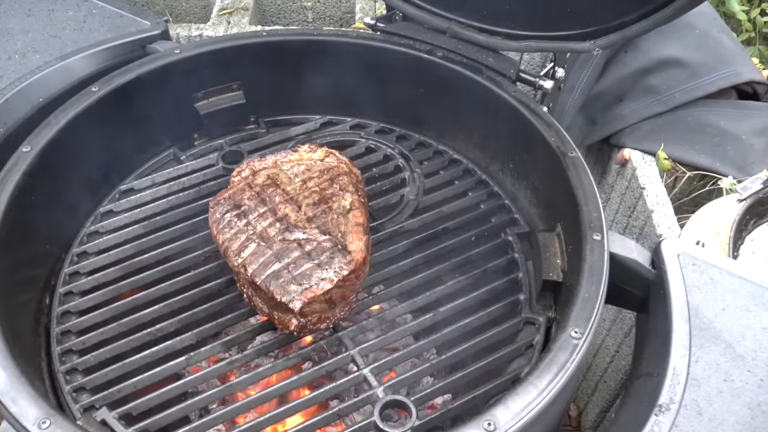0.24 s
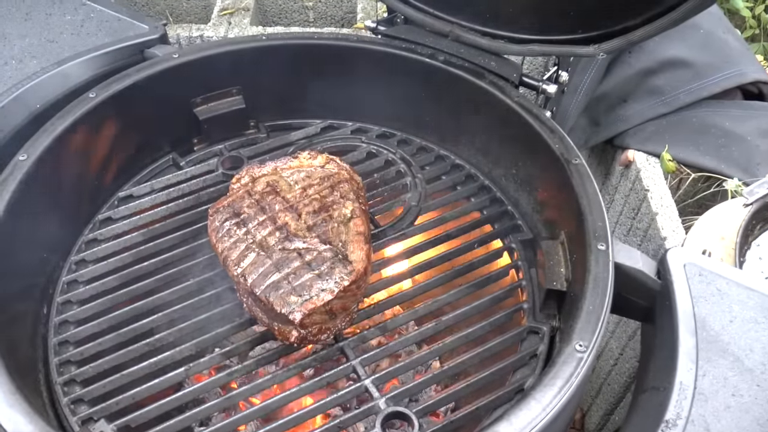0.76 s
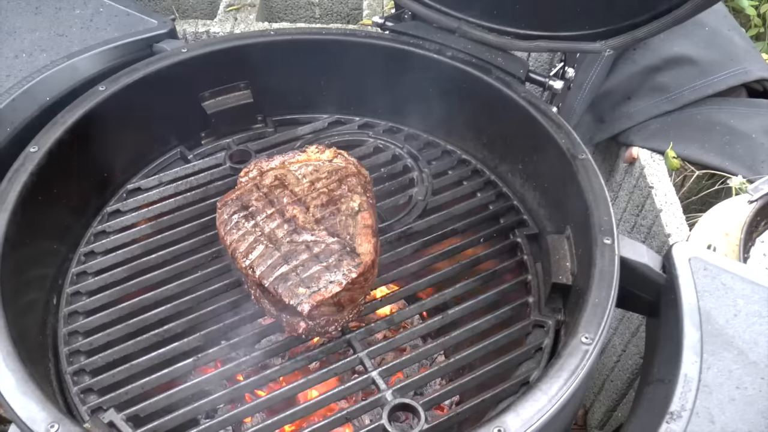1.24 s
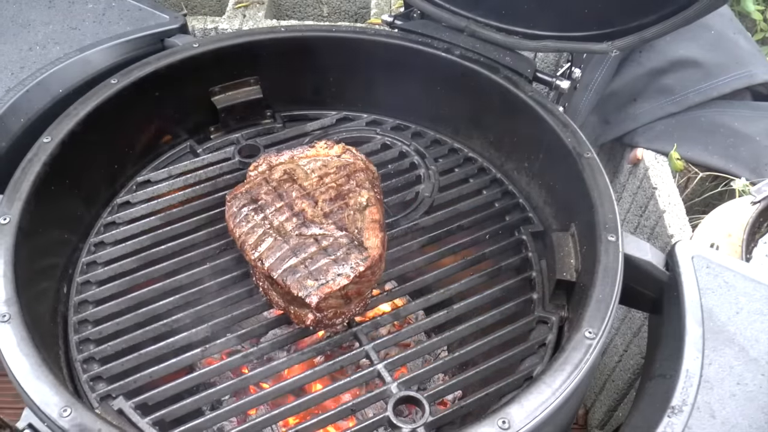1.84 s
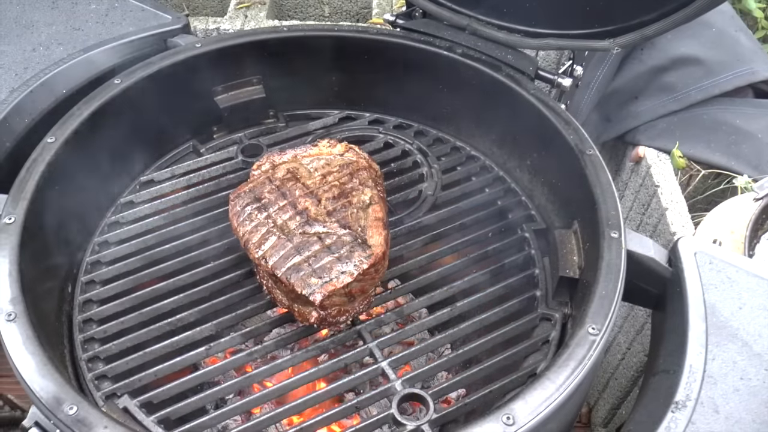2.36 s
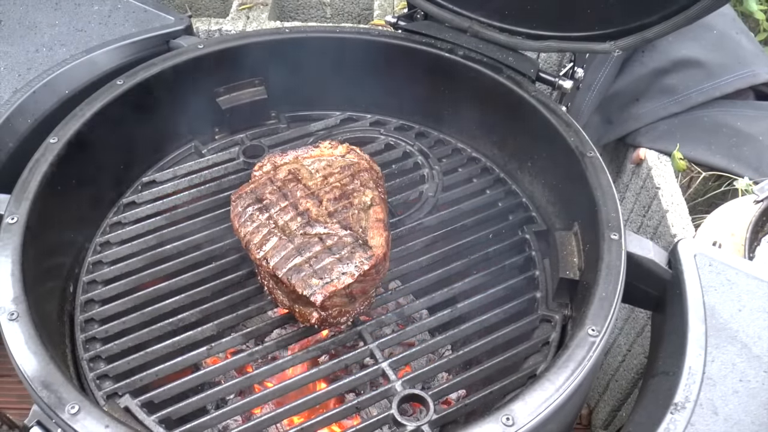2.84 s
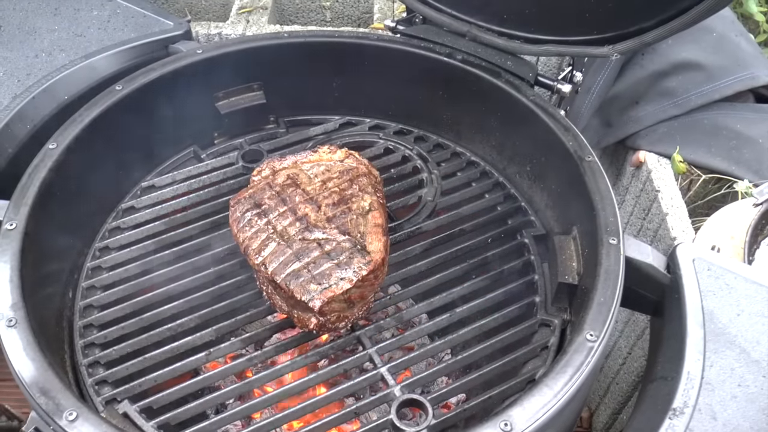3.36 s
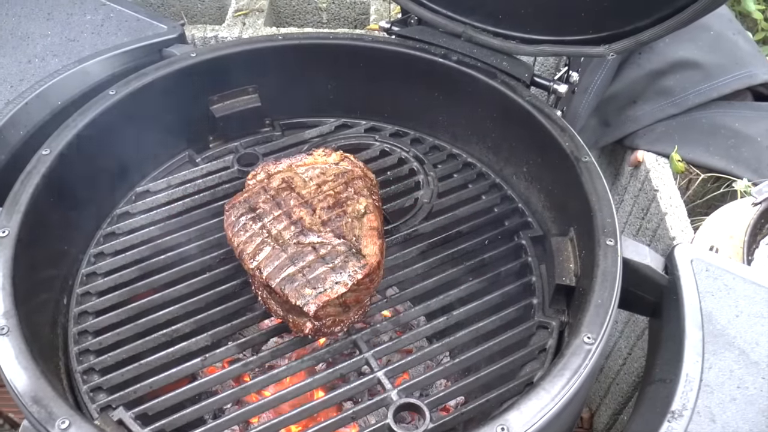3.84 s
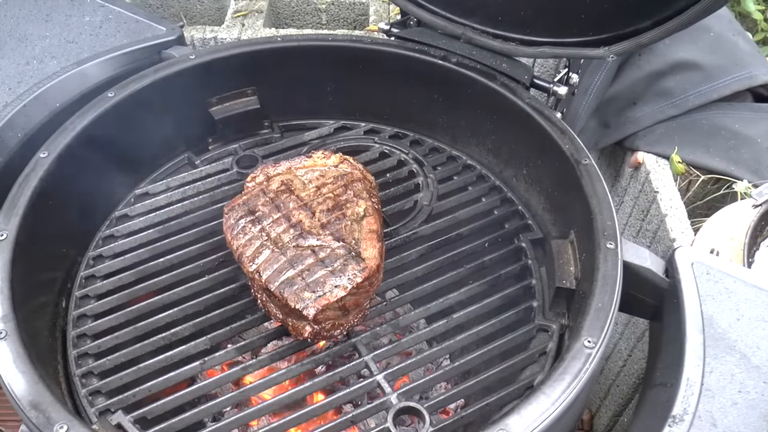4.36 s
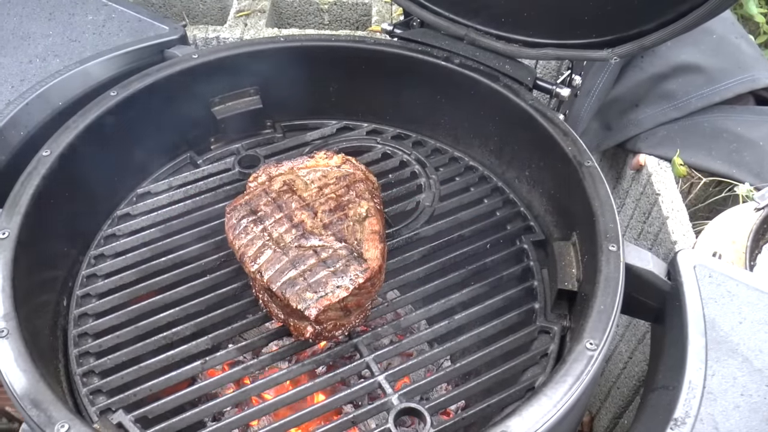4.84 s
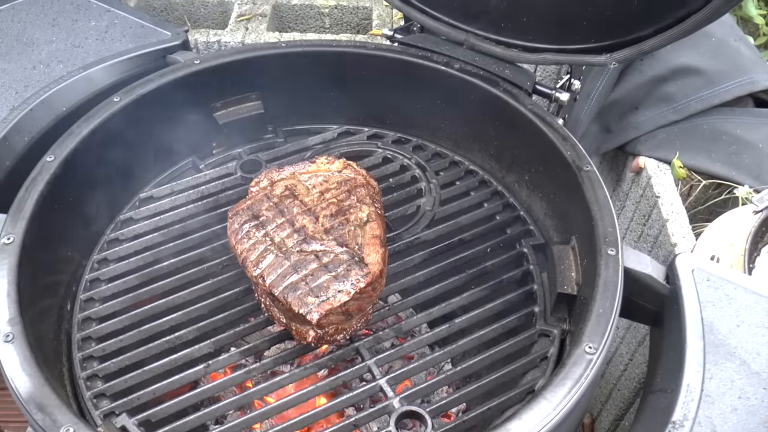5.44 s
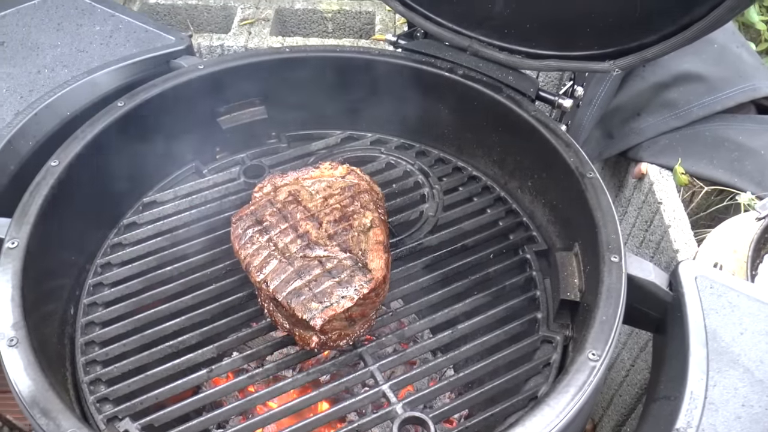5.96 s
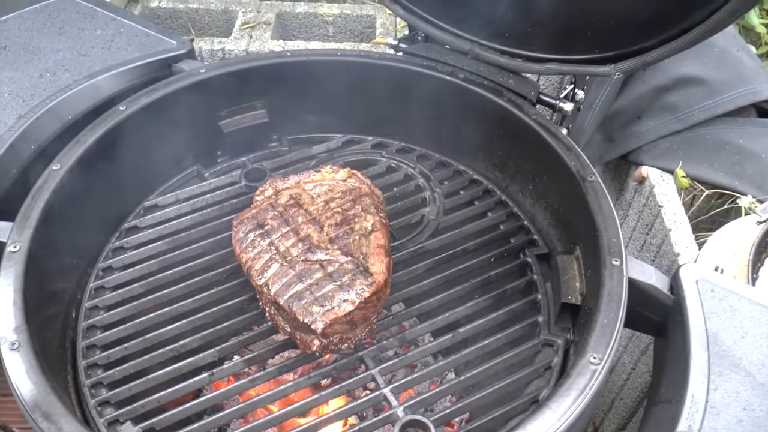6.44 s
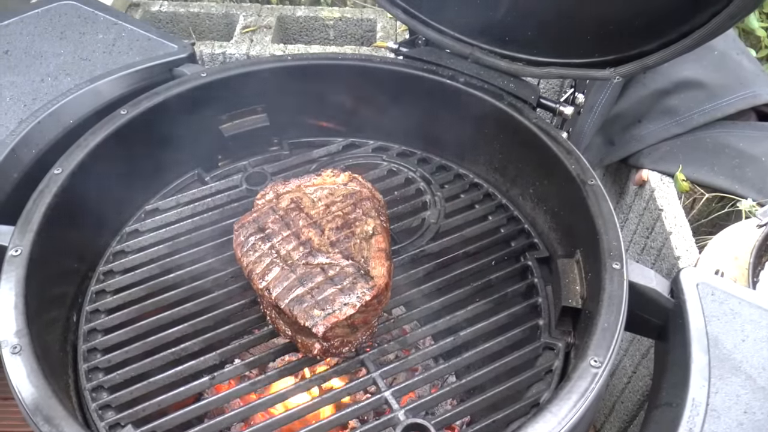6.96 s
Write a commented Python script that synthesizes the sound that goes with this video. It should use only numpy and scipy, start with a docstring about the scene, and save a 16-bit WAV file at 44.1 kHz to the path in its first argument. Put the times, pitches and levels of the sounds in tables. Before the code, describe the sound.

Outdoors, close above a round charcoal grill, in mono, a thick piece of meat sizzles without pause for about seven seconds. The sound is a bright, dense hiss of tiny bubbles, steam jets and dry crackle, fluctuating quickly, with boiling juice ringing faintly metallic in the bowl and thin hoarse steam notes fading in and out. Coals murmur softly below, stirring a little more around 0.9. Small fat spits pop in the first second; at about 0.74 a loud sharp crack comes with a cluster of soft low flare puffs. Two more puffs thump near 1.6. From 1.7 to 2.5 a wind gust rumbles low and flutters on the microphone. Afterwards come weak puffs of breeze, crisp ticks and spits near 3.8, 4.35, 4.9 and 6.9, and short fizzes near 5.4 and 6.0. The sizzle swells around 6.5 and is still going at the end.

```python
"""A thick piece of meat sizzles on the grate of a round charcoal grill outdoors, in mono from just above.
The crust is dense ringing bubbles, steam jets and crackle; juice boils through the bowl's resonances.
Beads fizz, steam sings in narrow bands, fat spits as noise bursts, droplets tick and drips flare as soft pushes.
Shaped noise and clicks make the fire's murmur; low noise is a breeze, a strong gust and several light ones.
"""
import sys
import numpy as np
from scipy import signal
from scipy.fft import rfft, irfft, next_fast_len
from scipy.io import wavfile
from scipy.ndimage import uniform_filter1d, map_coordinates

SR = 44100
rng = np.random.default_rng(int(sys.argv[2]) if len(sys.argv) > 2 else 0)


def unload_audio(sound):
    """Save the sound as a 16-bit wav file, at the path given as the first command line argument."""
    columns = np.transpose(np.atleast_2d(sound))
    # keep every value between -1 and 1, then stretch to whole-number steps
    steps = np.round(np.clip(columns, -1, 1) * 32767)
    wavfile.write(sys.argv[1], SR, steps.astype(np.int16))


N = 317079

# Resonances of the grill's bowl. Each row: frequency in Hz, bandwidth in Hz, relative level in dB.
BOWL_MODES = [(473, 79, -8), (697, 100, -10.5), (1441, 59, 6.5), (1920, 44, -1), (2065, 57, -0.5),
              (2581, 54, 7), (2994, 174, 7.5), (3316, 104, 1), (3575, 52, 5), (3977, 58, 2.5),
              (4450, 81, 0.5), (4970, 110, -16.5)]


def from_db(db):
    """Amplitude ratio: 20 dB is a factor of ten."""
    return 10 ** (np.asarray(db) / 20)


def rms_one(x):
    """Normalise to unit mean square, so that a gain sets the power."""
    return x / np.sqrt(np.mean(x ** 2) + 1e-20)


def in_time(rows):
    """Linear interpolation of a curve at every sample."""
    return np.interp(np.arange(N) / SR, *np.transpose(rows))


def drift(corner_hz):
    """Slow random modulation of unit power: noise through a double real pole."""
    step = 40   # samples from one computed value to the next
    pole = np.exp(-2 * np.pi * corner_hz * step / SR)
    noise = rng.standard_normal(N // step + 2002)
    slow = signal.lfilter([1], [1, -2 * pole, pole * pole], noise)[2000:]   # past the filter's onset
    return np.interp(np.arange(N) / step, np.arange(len(slow)), rms_one(slow))


def coloured(x, spectrum):
    """Zero-phase spectral shaping, with dB interpolated over log frequency."""
    hz, db = np.transpose(spectrum)
    size = next_fast_len(2 * len(x))
    bins = np.maximum(np.fft.rfftfreq(size, 1 / SR), 1)
    gain = from_db(np.interp(np.log(bins), np.log(hz), db))
    return irfft(rfft(x, size) * gain, size)[:len(x)]


def cut(x, hz, kind, order=2):
    """Causal low- or high-pass with a maximally flat passband."""
    sections = signal.butter(order, min(hz, .45 * SR), kind, fs=SR, output="sos")
    return signal.sosfilt(sections, x)


def resonance(x, hz, width_hz):
    """Damped oscillator: a pole pair whose bandwidth sets the decay; the peak gain is about 1."""
    r = np.exp(-np.pi * width_hz / SR)
    zeros = np.array([1, 0, -1]) * (1 - r * r) / 2
    poles = [1, -2 * r * np.cos(2 * np.pi * hz / SR), r * r]
    return signal.lfilter(zeros, poles, x + 1e-18)


def add(out, s, sound, peak_db):
    """Superposition: place a short sound at a time, scaled to a peak."""
    room = out[round(s * SR):][:len(sound)]
    scaled = from_db(peak_db) * sound / np.abs(sound).max()
    room += scaled[:len(room)]


def swell(start, end, fade_s):
    """Trapezoidal envelope with linear ramps inside its two ends."""
    t = np.arange(N) / SR
    return np.clip(np.minimum(t - start, end - t) / fade_s, 0, 1)


def hump(s, length):
    """Half-cosine envelope, centred on a time."""
    return np.cos(np.pi * np.clip((np.arange(N) / SR - s) / length, -.5, .5))


def wall_echo(x, share):
    """Single reflection from the wall of the bowl, delayed by the round trip."""
    round_trip_s = .00197
    return x + share * np.pad(x, (round(round_trip_s * SR), 0))[:N]


def bursts(per_s, spread_db, clump_db):
    """Bursting bubbles as random impulses: mostly small, a few large, with fluctuating strength."""
    sizes = from_db(spread_db * np.minimum(rng.exponential(1, N), 6)) * rng.choice([-1, 1], N)
    born = rng.random(N) < per_s / SR
    return rms_one(sizes * born * from_db(clump_db * drift(33.4)))


def bubbles(low_hz, high_hz, per_s, spread_db, sharpness, patchy_db, count=16):
    """Bubbles as damped resonators: each size rings briefly and waxes and wanes by itself."""
    out = np.zeros(N)
    for hz in np.geomspace(low_hz, min(high_hz, .45 * SR), count):
        clicks = bursts(per_s / count, spread_db, clump_db=5.0) * from_db(patchy_db * drift(10.0))
        out += resonance(clicks, hz, hz / sharpness)
    return rms_one(out)


def eddies(colour):
    """Turbulence as shaped noise, levelled by its local root mean square over a ninth of a second."""
    noise = coloured(rng.standard_normal(N), colour)
    return noise / np.sqrt(uniform_filter1d(noise ** 2, size=SR // 9))


def wind():
    """Turbulent pressure on the microphone: large eddies rumble, small fast ones flutter, a breeze sways."""
    # Each row of the three colours: frequency in Hz, relative level in dB.
    breeze_colour = [(3, -22), (11, 4.5), (20, -5), (30, -16), (55, -18), (80, -20.5), (120, -32),
                     (300, -53), (2000, -90)]
    gust_colour = [(6, -10.5), (18, -1.5), (30, 6.5), (55, -2.5), (80, -10.5), (120, -22.5), (200, -30.5),
                   (400, -54), (2000, -92)]
    flutter_colour = [(20, -13), (50, -0.5), (70, 4.5), (110, -4), (170, -10.5), (260, -24.5), (430, -34),
                      (800, -48), (2000, -66)]
    # The strong gust. Each row: time in seconds, rumble and flutter in dB before their trims.
    strong_gust = [(1.64, -44, -42), (1.768, -17.5, -45), (2.066, -22.5, -36.5), (2.24, -29, -29.5),
                   (2.36, -19, -41), (2.444, -36, -39), (2.458, -35, -49), (2.52, -37.5, -52)]
    # Smooth swells. Each row: centre in seconds, length in seconds, rumble in dB, flutter in dB.
    light_gusts = [(1.247, 0.14, -34.5, -58), (2.81, 0.36, -35, -53), (3.063, 0.18, -33.5, -53),
                   (3.855, 0.47, -36, -48), (4.92, 0.32, -43, -53), (5.68, .3, -46, -60),
                   (6.244, 0.18, -40, -39)]
    rumble_trim_db, flutter_trim_db, fade_s = 2.5, 4, 0.093
    breeze_db, breeze_eddies_db = -38, -59.5

    t = np.arange(N) / SR
    s, rumble_db, flutter_db = np.transpose(strong_gust)
    blowing = swell(s[0] - fade_s, s[-1] + fade_s, fade_s)
    rumble = from_db(breeze_eddies_db) + blowing * from_db(np.interp(t, s, rumble_db) + rumble_trim_db)
    flutter = blowing * from_db(np.interp(t, s, flutter_db) + flutter_trim_db)
    for when, length, low_db, high_db in light_gusts:
        rumble = rumble + hump(when, length) * from_db(low_db)
        flutter = flutter + hump(when, length) * from_db(high_db)
    breeze = from_db(breeze_db) * eddies(breeze_colour)
    return breeze + rumble * eddies(gust_colour) + flutter * eddies(flutter_colour)


def flames():
    """Combustion noise: the coals murmur low, and a growing draught raises rustle faster than murmur."""
    # Draught of the fire. Each row: time in seconds, level in dB before the gains of the two layers.
    draught = [(0.0, -47.5), (0.92, -44), (1.62, -46), (2.84, -48), (3.8, -47), (5.89, -47.5), (7.19, -48)]
    # Each row of the two colours: frequency in Hz, relative level in dB.
    murmur_colour = [(30, 5), (110, -1.5), (175, 2), (240, -7), (320, -21.5), (450, -11), (600, -23),
                     (1100, -31), (4000, -33)]
    rustle_colour = [(200, -18), (350, -4), (500, 5), (700, 1.5), (1000, 4.5), (1800, -12), (4000, -15.5)]

    draught_db = in_time(draught)
    murmur = rng.standard_normal(N) + from_db(-2.5) * bursts(per_s=80, spread_db=1.5, clump_db=3.0)
    rustle = bursts(per_s=500, spread_db=3.0, clump_db=2.0)
    flaring = from_db(draught_db - draught_db.max())
    murmur = from_db(2) * rms_one(coloured(murmur, murmur_colour))
    rustle = from_db(-10.0) * flaring * rms_one(coloured(rustle, rustle_colour))
    return from_db(draught_db) * (murmur + rustle)


def puffs():
    """Cavity excitation: a drip catches fire and its push of air booms in the grill's belly."""
    # Drips flaring on the coals. Each row: start in seconds, peak in dB.
    flares = [(0.074, -31), (0.262, -33), (0.592, -34), (0.712, -24.5), (0.736, -22.5), (0.751, -21.5),
              (1.136, -35.5), (1.269, -45), (1.544, -21.5), (1.606, -22), (2.602, -32), (2.735, -31.5),
              (3.309, -28), (3.974, -30.5), (4.486, -27.5)]
    rise_s, fall_s = 0.001, 0.0024
    belly_hz, belly_width_hz, boom_top_hz = 180, 49, 265
    knock_db = -9   # the push also knocks on the bowl

    out, t = np.zeros(N), np.arange(SR // 10) / SR
    push = np.exp(-t / fall_s) * (1 - np.exp(-t / rise_s))
    for s, db in flares:
        pitch = belly_hz * from_db(0.26 * rng.standard_normal())   # varies by about 3 %
        boom = cut(resonance(push, pitch, belly_width_hz), boom_top_hz, "low", order=3)
        knock = resonance(push, 510, 120) - from_db(-3) * resonance(push, 900, 400)
        add(out, s, boom + from_db(knock_db) * knock, db)
    return out


def steam():
    """Resonant flow noise: steam escapes through narrow gaps between meat and bar with a hoarse note."""
    # Each row: start in seconds, end in seconds, pitch in Hz, level in dB.
    notes = [(0.0, 0.502, 3060, -48), (0.523, 0.967, 3470, -45.5), (1.0, 1.402, 3020, -45),
             (1.22, 1.75, 1392, -52), (2.0, 2.3, 4020, -51), (2.473, 3.402, 2525, -49),
             (2.498, 3.502, 3016, -46.5), (2.55, 3.253, 4550, -49), (3.447, 3.748, 3390, -51),
             (4.05, 4.457, 3060, -49), (4.55, 5.08, 3620, -49), (4.447, 5.05, 5180, -49),
             (4.697, 5.55, 3090, -50), (5.71, 6.5, 2500, -49), (5.75, 6.55, 4510, -50.5)]
    relative_width, fade_s = 0.026, 0.13   # bandwidth as a share of the pitch; rise and fall

    out = np.zeros(N)
    for start, end, hz, db in notes:
        width = relative_width * hz
        note = resonance(resonance(rng.standard_normal(N), hz, width), hz, 4 * width)
        out += from_db(db) * rms_one(note) * swell(start, end, fade_s)
    return out


def ticks():
    """Impulsive vaporisation: droplets snap on the hot iron as fast-decaying, bright noise."""
    # Each row: start in seconds, peak in dB.
    snaps = [(0.745, -7), (1.696, -24), (1.899, -15), (2.14, -16), (3.64, -18), (3.842, -17), (4.3487, -15),
             (4.905, -13), (7.076, -20)]
    out, t = np.zeros(N), np.arange(SR // 50) / SR
    for s, db in snaps:
        snap = rng.standard_normal(len(t)) * np.exp(-t / .0007)
        add(out, s, resonance(snap, 11000, 7000), db)
    return out


def spits():
    """Explosive boiling: a drop of fat cracks, then its short spatter rings faintly in the bowl's modes."""
    # Each row: start in seconds, peak in dB, length of the spatter in seconds, top edge in Hz.
    explosions = [(0.071, -24, 0.0082, 4000), (0.308, -29, 0.0033, 3000), (0.382, -23, 0.011, 7000),
                  (0.412, -26.5, 0.0027, 2200), (0.661, -23.5, 0.0039, 5000), (0.743, -8.5, 0.0059, 6500),
                  (0.959, -22, 0.0028, 3800), (0.979, -28, 0.0061, 3500), (1.316, -27.5, 0.0056, 4500),
                  (2.346, -25.5, 0.0049, 6000), (3.572, -26, 0.0059, 4000), (3.637, -26, 0.0041, 5000),
                  (3.7761, -16.5, 0.0025, 5400), (4.3512, -18, 0.0047, 11000), (4.359, -20.5, 0.0065, 9000),
                  (6.632, -26.5, 0.011, 6500), (6.907, -18, 0.0017, 5600)]
    crack_db = 13.5   # relative to the starting spread of the spatter

    out, t = np.zeros(N), np.arange(SR // 10) / SR
    for s, db, length, top_hz in explosions:
        spatter = rng.standard_normal(len(t)) * np.exp(-(t / length) ** 2)
        spatter[0] += from_db(crack_db)
        # a broad resonance over a wideband body
        sound = resonance(spatter, 2440, 2200) + from_db(-3.5) * cut(spatter, 230, "high")
        sound = cut(sound, top_hz, "low", order=3)
        rings = sum(resonance(sound, hz, width) * from_db(mode_db) for hz, width, mode_db in BOWL_MODES)
        add(out, s, sound + .4 * rings, db)
    return out


def squirts():
    """Rapid boiling: a bead of juice meets the iron and fizzes away in a band of very dense bubbles."""
    # Each row: centre in seconds, length in seconds, level in dB, centre of the band in Hz.
    beads = [(0.385, .06, -40, 11500), (1.67, .08, -41, 10000), (1.795, 0.044, -33, 7000),
             (1.91, .08, -36, 10000), (3.136, .1, -36, 10000), (4.9, 0.13, -38, 11000),
             (5.42, 0.042, -34, 10500), (5.775, .05, -38, 12000), (6.039, 0.063, -33, 6800),
             (6.714, .08, -41, 8500)]
    relative_width = 0.47   # of the narrower resonance, as a share of the centre

    out, fizz = np.zeros(N), bursts(per_s=26000, spread_db=4.5, clump_db=-0.5)
    for s, length, db, hz in beads:
        width = relative_width * hz
        band = resonance(resonance(fizz, hz, width), hz, 2 * width)
        out += from_db(db) * rms_one(band) * hump(s, length)
    return out


def juice():
    """Modal excitation: juice boiling on the bars is heard directly and through the bowl's resonances."""
    # Each row: time in seconds, level in dB before the gains of the two paths.
    boil_level = [(0.0, -36), (0.6, -38.5), (0.72, -32.5), (0.84, -39), (2.02, -36), (2.36, -39),
                  (2.62, -37), (3.9, -37.5), (4.36, -36.5), (4.56, -38), (4.88, -35.3), (4.98, -37),
                  (5.44, -35.5), (5.64, -42), (5.86, -35.5), (6.56, -36.5), (7.1, -34), (7.18, -37)]
    # Strongest low resonance from above, used relative to its mean. Each row: time in seconds, pitch in Hz.
    bowl_pitch = [(0.0, 1427), (0.46, 1428), (0.76, 1466), (1.06, 1411), (3.08, 1420), (4.98, 1471),
                  (5.97, 1416), (7.19, 1461)]
    # Each row: frequency in Hz, relative level in dB.
    boil_colour = [(250, 15.5), (900, -26), (1700, 0.5), (2800, -0.5), (4500, -3), (6000, 4.5),
                   (10000, -34)]
    ring_db, direct_db = -4, -7.5

    clicks = bursts(per_s=9000, spread_db=3.0, clump_db=1.68)
    # the boiling spots wander, so each resonance is fed now more, now less
    rings = sum(resonance(clicks * from_db(db + 1.55 * drift(1.6)), hz, width)
                for hz, width, db in BOWL_MODES)
    # all resonances slide a little as the microphone sways over the bowl
    pitch = in_time(bowl_pitch)
    rings = map_coordinates(rings, [np.cumsum(pitch / pitch.mean())], order=3, mode="mirror")
    direct = bubbles(860, 7150, per_s=9000, spread_db=1.0, sharpness=3.4, patchy_db=0.0)
    direct = wall_echo(coloured(direct, boil_colour), share=0.27)
    paths = from_db(ring_db) * rms_one(rings) + from_db(direct_db) * rms_one(direct)
    return from_db(in_time(boil_level)) * paths


def pores(count=320):
    """Jet noise: pores in the crust open for a moment, each hissing at a pitch of its own."""
    out = np.zeros(N)
    for when, lasting, pitch, strength in rng.random((count, 4)):
        size = int((.08 + .3 * lasting) * SR)
        jet = resonance(rng.standard_normal(size), 4500 * 2.7 ** pitch, 160)
        add(out, when * (N - 1) / SR, jet * np.hanning(size), -6 * strength)
    return rms_one(out)


def tilted(x, tilt_db):
    """Spectral tilt: a seesaw between the lower and the upper part of the sizzle."""
    upper = coloured(x, [(6500, -40), (7500, -14), (8300, -4), (9200, 0)])   # Hz, dB
    return (x - upper) * from_db(-tilt_db / 2) + upper * from_db(tilt_db / 2)


def crust():
    """Boiling noise: ringing bubbles, tiny jets and dry crackle, louder and brighter with the vigour."""
    # Vigour, as juice reaches the hot crust, used relative to its mean. Each row: time in seconds, level in dB.
    vigour = [(0.0, -31), (0.24, -33.5), (0.38, -30), (0.5, -36.5), (0.74, -33.5), (0.88, -38.5),
              (1.0, -35), (1.16, -37), (1.28, -32.3), (1.38, -34.5), (1.6, -31), (1.96, -31), (2.34, -34.5),
              (2.46, -31), (3.18, -30.5), (3.8, -34.5), (3.94, -32), (4.06, -36.4), (4.16, -31.5),
              (5.0, -30.5), (5.14, -32.5), (5.28, -30), (5.64, -35.5), (5.8, -30), (5.92, -35), (6.48, -28),
              (6.58, -32.0), (7.18, -30)]
    # Slow changes of brightness. Each row: time in seconds, treble tilt in dB before the vigour's share.
    brightness = [(0.0, 0), (1.0, 0), (1.55, 1.5), (2.4, -0.5), (2.85, 1), (3.6, -1), (4.95, 3),
                  (5.45, 1.5), (5.95, -4), (6.2, 1), (7.19, -3.5)]
    # Each row of the two colours: frequency in Hz, relative level in dB.
    sear_colour = [(600, -36), (1300, -24), (3000, -8.5), (5000, -7.5), (6200, -4), (7300, 0), (8300, 0),
                   (10000, -4), (12000, -14), (16000, -4.5)]
    spray_colour = [(4000, -47), (8000, -10.5), (11000, 4), (13000, 2.5), (15800, -15.5)]
    # levels at mean vigour (dB); gain and tilt in dB per dB of vigour
    sear_db, sear_follows, tilt_follows = -36, 1.14, 0.2
    spray_db, spray_follows = -43, 0.8
    # random level changes: spread (dB), corner (Hz)
    sputter_db, sputter_hz = 0.88, 28
    flurry_db, flurry_hz = 0.55, 12

    vigour_db = in_time(vigour) - in_time(vigour).mean()
    fizz = bubbles(4400, 14050, per_s=20000, spread_db=1.0, sharpness=5.2, patchy_db=0.1)
    crackle = bursts(per_s=8200, spread_db=1.5, clump_db=1.9)
    voices = coloured(fizz + from_db(-3) * crackle + from_db(-5.0) * pores(), sear_colour)
    sear = rms_one(tilted(voices, in_time(brightness) + tilt_follows * vigour_db))
    sear = sear * from_db(sear_db + sear_follows * vigour_db)

    mist = bursts(per_s=9500, spread_db=3.5, clump_db=1.5)
    spray = rms_one(coloured(mist + from_db(-8.5) * crackle, spray_colour))
    spray = spray * from_db(spray_db + spray_follows * vigour_db + flurry_db * drift(flurry_hz))
    return wall_echo(sear + spray, share=0.08) * from_db(sputter_db * drift(sputter_hz))


def scene():
    """Superposition of all sources at one microphone; both channels are alike."""
    meat = crust() + squirts() + juice() + steam() + spits() + ticks()
    return np.tile(meat + flames() + puffs() + wind(), (2, 1))


def record(dry):
    """Band limiting: a steep elliptic low-pass cuts the top above 15850 Hz."""
    low_pass = signal.ellip(12, .1, 80, 15850, fs=SR, output="sos")   # 0.1 dB ripple, 80 dB stopband
    return signal.sosfilt(low_pass, dry)


dry = scene()
out = record(dry)
unload_audio(out)
```